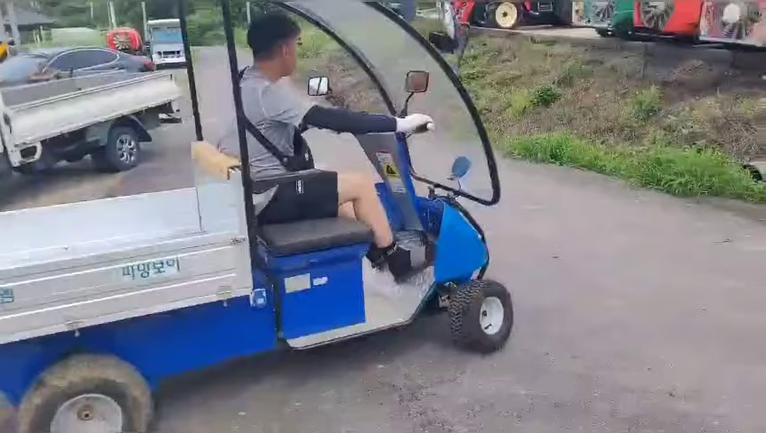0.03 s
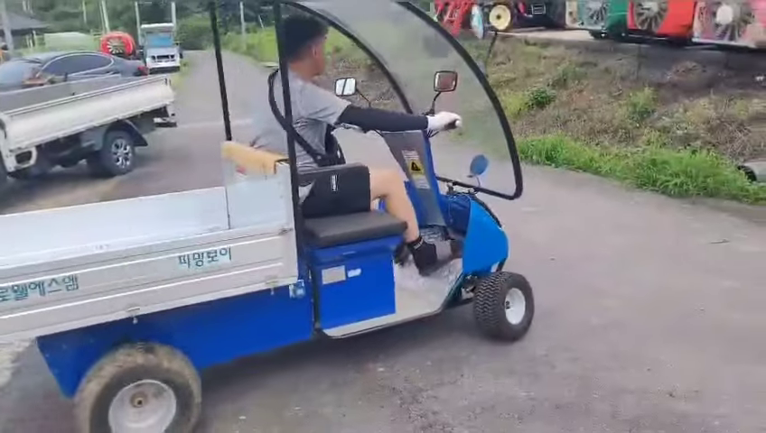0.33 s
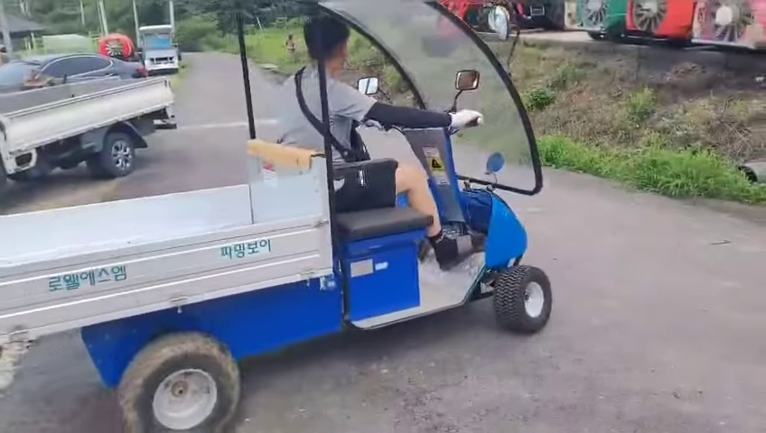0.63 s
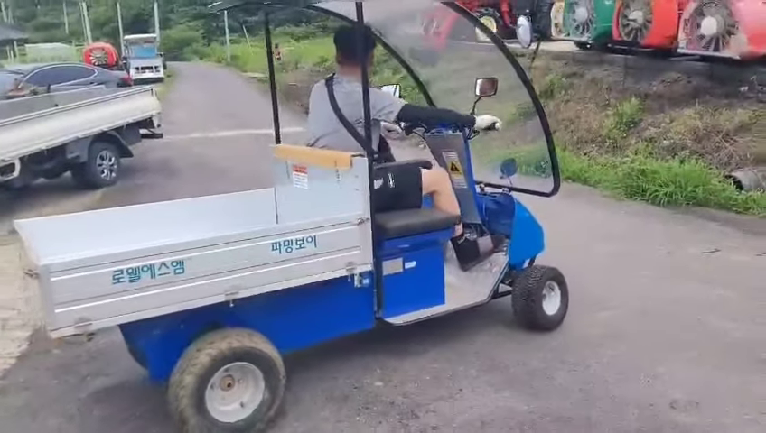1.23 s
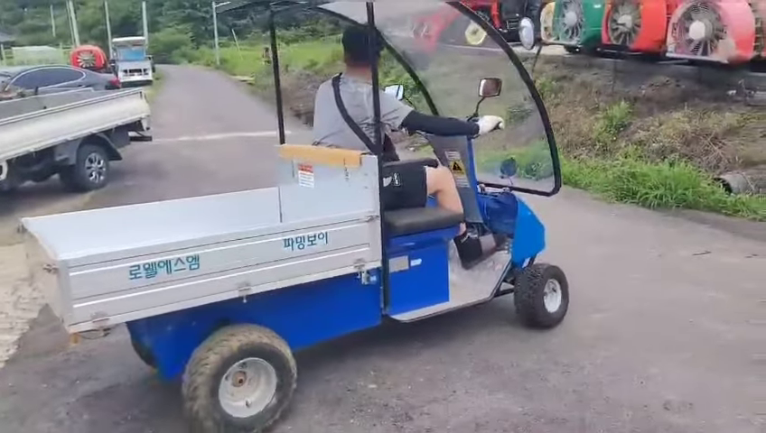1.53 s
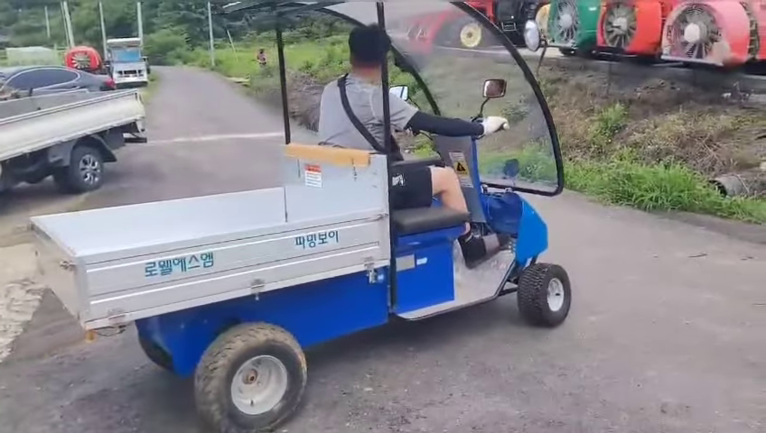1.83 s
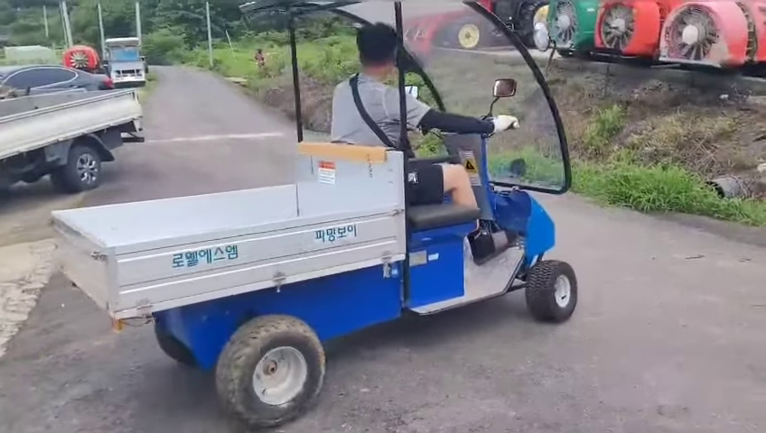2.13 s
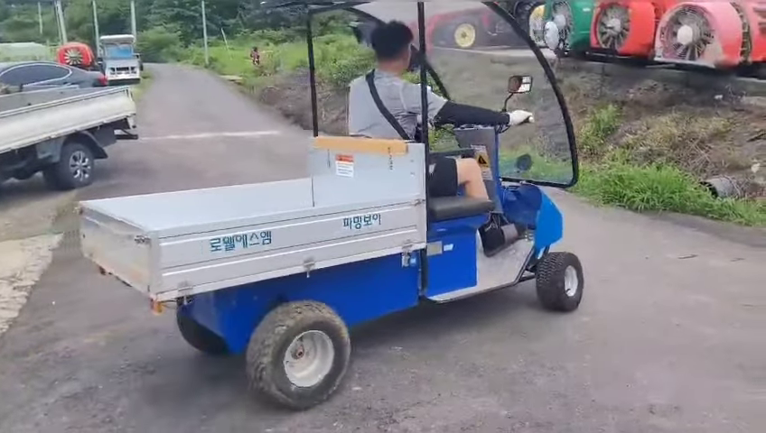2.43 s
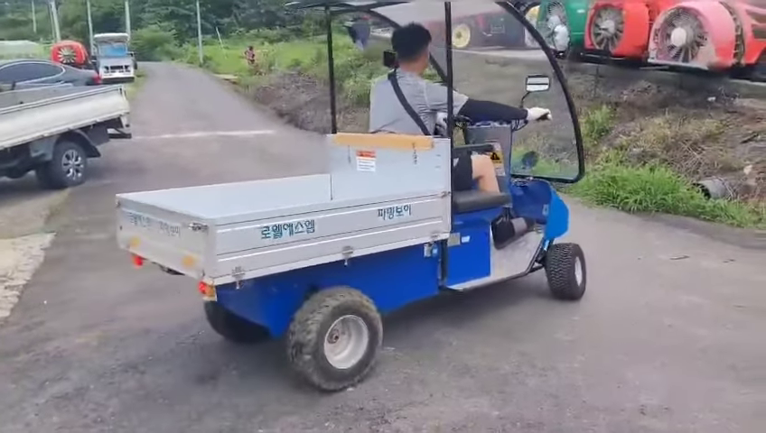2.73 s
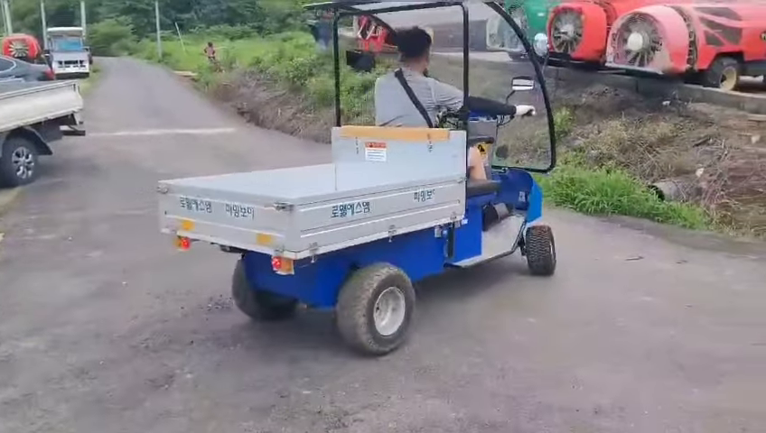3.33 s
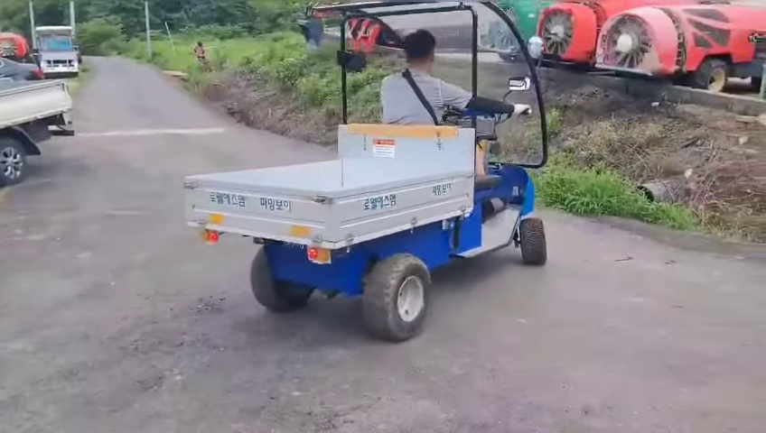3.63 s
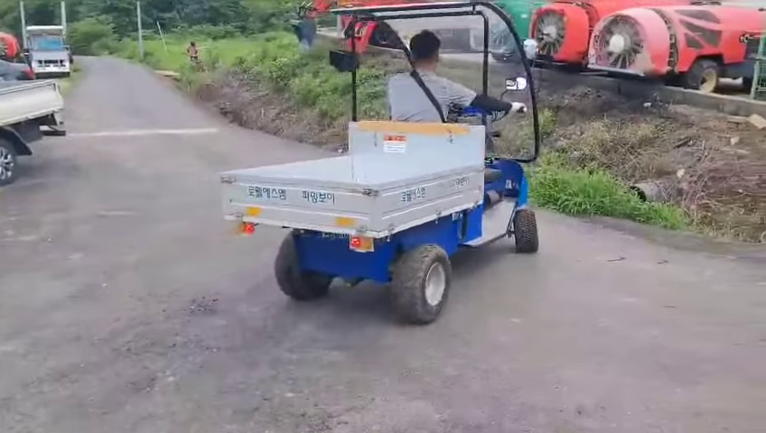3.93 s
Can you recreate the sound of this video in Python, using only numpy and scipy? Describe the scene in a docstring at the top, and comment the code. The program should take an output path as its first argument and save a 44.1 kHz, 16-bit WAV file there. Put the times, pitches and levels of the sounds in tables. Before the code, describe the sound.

An electric utility cart drives off over asphalt with a low hum, tyre thuds, crunching grit and light metal rattles, bumpiest late on. High cicada buzzing fills the open air around the microphone, closing with a few thin chirps.

```python
"""Electric cart and cicadas.

A small electric cart rolls away over a paved lot. Its motor whirrs low; the tyres rumble, thud over
bumps and crunch grit; the metal load bed knocks, rattles and squeaks. Two cicadas sing nearby, each
a train of tymbal clicks through a body resonance, over the hiss of a distant chorus.
Thin insect chirps close the scene."""
import sys
import numpy as np
from scipy.fft import rfft, irfft, next_fast_len
from scipy.io import wavfile
from scipy.ndimage import map_coordinates

SR = 44100
rng = np.random.default_rng(int(sys.argv[2]) if len(sys.argv) > 2 else 0)


def waveform_to_disk(signal):
    """Save audio, clipped to [-1, 1], as 16-bit WAV at the path in sys.argv[1]."""
    frames = np.transpose(np.atleast_2d(signal))
    scaled = np.clip(frames, -1, 1) * 32767
    samples = np.round(scaled).astype(np.int16)
    wavfile.write(sys.argv[1], SR, samples)


N = 176400
T = np.arange(N) / SR

# Left-right likeness of noise: freq_hz, correlation
EAR_CORRELATION = [(60, 0.9), (200, 1), (380, 0.94), (690, 0.2), (1280, 0.0056), (8000, 0)]

# Motor hum: time_s, pitch_hz
MOTOR_PITCH = [(0, 162.6), (2.9, 167), (3.1, 169), (3.5, 157), (4, 162.1)]
# Motor envelope: time_s, level_db
MOTOR_LEVEL = [(0, -42.5), (.3, -53.5), (.75, -58.5), (1.15, -66.5), (1.45, -49), (1.8, -59.5), (2.3, -59),
               (2.75, -51.5), (3.03, -42.5), (3.23, -46.5), (3.48, -44), (3.62, -54.5), (4, -53.5)]
# Motor whirr: freq_hz, gain_db
WHIRR_SPECTRUM = [(90, -38), (135, -10.5), (160, -6.5), (182, 3), (215, -11), (320, -15.5), (600, -58)]

# Tyre rumble envelope: time_s, level_db
RUMBLE_LEVEL = [(0, -41.5), (.3, -48), (.8, -54.5), (1.15, -54.5), (1.5, -46.5), (2.15, -53), (2.4, -42.5),
                (2.66, -42.5), (2.78, -47.5), (2.95, -42.5), (3.1, -46), (3.5, -46), (3.7, -41.5),
                (3.8, -46.5), (3.95, -41)]
# Road roar and tread hiss envelopes: time_s, road_db, tread_db
ROLLING_LEVELS = [(0.0, -46.5, -56.5), (0.18, -53, -54), (0.57, -52, -58), (1.28, -53, -59.5),
                  (1.66, -54, -56.5), (2.13, -53, -63), (2.49, -52, -57), (2.7, -51, -59),
                  (2.91, -48, -51.5), (3.43, -54, -55), (4.0, -52, -54.5)]
# Tyre rumble: freq_hz, gain_db
RUMBLE_SPECTRUM = [(20, -22), (35, -6), (52, -4.5), (72, 1), (92, -9), (125, -9), (220, -16.5),
                   (500, -45.5)]
# Road roar: freq_hz, gain_db
ROAD_SPECTRUM = [(100, 5.5), (240, 5.5), (340, 4), (490, -3.5), (790, 4), (1100, -2), (1900, -16),
                 (4300, -15.5), (15000, -32)]
# Tread hiss: freq_hz, gain_db
TREAD_SPECTRUM = [(600, -7.5), (1500, 2.5), (2800, 1), (4300, 3), (5000, 0.5), (7000, -12), (15000, -45)]

# First cicada's song: time_s, body_hz, clear_db, rasp_db
FIRST_SONG = [(0, 7050, -62, -41.5), (.58, 7140, -56, -42.5), (.68, 8310, -52, -45.5), (.8, 8980, -50, -55),
              (.95, 8825, -49, -54), (1.5, 9080, -47, -52), (1.8, 9050, -48, -50), (2.0, 8910, -46, -53),
              (2.25, 8670, -46, -48), (2.75, 8760, -48, -51), (3.05, 8860, -55.5, -57),
              (4, 8800, -49.5, -62)]
# Its tymbal clicks: time_s, rate_hz
FIRST_CLICKS = [(0, 501), (.58, 500), (.75, 486), (.92, 480.5), (1.5, 478.6), (1.7, 479.3), (1.9, 481.7),
                (2.3, 481.9), (4, 481.3)]
# Its flutter: time_s, rate_hz
FLUTTER_RATE = [(.55, 109), (.9, 85), (1.68, 78.5), (1.74, 114.5), (2.35, 109), (4, 106)]
# Its rasp about the body resonance: offset_hz, gain_db
RASP_SPECTRUM = [(-2400, -43), (-1200, -15.5), (-500, -1.5), (-84, -1), (214, 0), (480, -1.5), (680, -10.5),
                 (950, -5), (1498, -14), (3000, -67), (5000, -58)]
# Second cicada's song: time_s, body_hz, level_db
SECOND_SONG = [(0, 7350, -49.5), (.48, 7270, -49), (.58, 6600, -48.5), (.75, 6600, -56.5),
               (1.25, 6680, -55), (1.45, 6580, -47.5), (1.85, 6520, -50), (2.4, 6340, -49.5),
               (2.8, 6300, -48.5), (3.3, 6210, -47), (3.48, 6340, -47), (3.56, 6420, -48),
               (3.66, 6600, -61)]
# Its tymbal clicks: time_s, rate_hz, jitter_percent
SECOND_CLICKS = [(0, 539, .25), (.48, 540, .25), (.58, 548, .45), (.85, 544, .15), (1.55, 539.8, .07),
                 (2, 538.5, .15), (2.4, 538, .3), (2.7, 536, .95), (3.3, 530, .95), (3.42, 527, .5),
                 (3.49, 526, .3), (3.53, 541, 1.2), (3.63, 527, .9)]
# Distant chorus envelope: time_s, level_db
CHORUS_LEVEL = [(0, -50.5), (.58, -50), (.85, -43), (2, -42), (3.2, -44), (4, -43.5)]
# Distant chorus: freq_hz, gain_db
CHORUS_SPECTRUM = [(4900, -24), (5600, -9), (6500, -4), (7400, -6), (7800, -1), (8400, 1.5), (9200, -2.5),
                   (10300, -6), (11200, -13.5), (12000, -19), (15000, -27.5)]

# Load bed modes: freq_hz, gain_db
BED_MODES = [(600, -18), (786, -7.5), (1235, -3), (1426, -5.5), (1757, -8.5), (2146, -18), (2435, -20)]
# Load bed knocks: start_s, level_db, ring_hz
BED_KNOCKS = [(.003, -40, 890), (.198, -40, 706), (.278, -48, 1390), (0.376, -53, 1400), (.491, -43, 680),
              (.616, -48, 870), (0.832, -49, 1125), (1.185, -47.5, 680), (1.383, -45, 519),
              (1.398, -45, 870), (1.931, -35, 381), (1.945, -47, 620), (1.967, -47, 796), (2.335, -47, 790),
              (2.795, -37.5, 1520), (2.875, -31.5, 552), (2.882, -40, 1390), (2.899, -39.5, 780),
              (2.922, -37.5, 584), (2.956, -50, 1760), (3.005, -37, 450), (3.015, -43, 1000),
              (3.244, -45.5, 930), (3.304, -40.5, 1670), (3.334, -48, 1510)]
# Tyre thuds: start_s, level_db, pitch_hz
TYRE_THUDS = [(0.019, -46, 178), (0.178, -41, 62.4), (1.67, -34.5, 58.6), (2.014, -38, 71.4),
              (2.325, -33, 90.4), (2.63, -39, 62.8), (2.896, -31, 84), (2.951, -26.5, 65),
              (2.974, -33, 69.5), (3.456, -40, 75), (3.683, -33.5, 65.6), (3.88, -34.5, 47.3)]
# Grit crunches: start_s, length_s, level_db
GRIT_CRUNCHES = [(0.07, 0.028, -59), (0.961, 0.06, -54), (1.443, 0.095, -54), (1.696, 0.036, -54),
                 (1.968, 0.076, -48), (2.656, 0.049, -51), (2.773, 0.074, -45), (2.83, 0.083, -52),
                 (3.233, 0.15, -55), (3.55, 0.3, -54)]
# Stones snapping under the tread: start_s, level_db
STONE_SNAPS = [(0.075, -49), (.783, -47.5), (0.991, -50), (1.471, -43.5), (1.505, -46), (1.705, -49.5),
               (2.004, -52), (2.681, -44), (2.797, -41), (2.884, -48)]
# Grit clicks and knock ticks: freq_hz, gain_db
CLICK_SPECTRUM = [(500, -12), (1300, 4), (2800, 6.5), (4500, 4.5), (9000, -5), (15000, -29)]
# Cart squeaks: start_s, length_s, from_hz, to_hz, level_db
CART_SQUEAKS = [(1.332, .042, 10690, 10520, -47.5), (1.59, .06, 10550, 10490, -42.5)]
# Insect chirps: start_s, length_s, from_hz, to_hz, level_db
INSECT_CHIRPS = [(3.63, 0.18, 7900, 7610, -46), (3.66, .14, 6200, 6080, -53),
                 (3.78, 0.072, 7600, 7480, -45), (3.785, .22, 6500, 6330, -50),
                 (3.85, .17, 8000, 7770, -43)]


def amp(db):
    """Decibels to gain."""
    return 10 ** (np.asarray(db) / 20)


def unit(x):
    """Scale to rms 1."""
    return x / np.sqrt(np.mean(x ** 2) + 1e-20)


def along(points, hz):
    """Interpolate (freq_hz, value) points on a log axis."""
    freq_hz, values = np.transpose(points)
    return np.interp(np.log(hz + 1), np.log(freq_hz + 1), values)


def curves(rows):
    """One per-sample curve for each column after time_s."""
    time_s, *columns = np.transpose(rows)
    return [np.interp(T, time_s, column) for column in columns]


def wobble(rate_hz):
    """Smooth random curve, rms near 1, with knots at rate_hz."""
    return map_coordinates(rng.standard_normal(8192), [T * rate_hz], mode="wrap")


def filtered(x, response):
    """Apply a zero-phase gain, response(hz)."""
    size = next_fast_len(N + 8192)
    return irfft(rfft(x, size) * response(np.fft.rfftfreq(size, 1 / SR)), size)[..., :N]


def pan(left_db):
    """Stereo gains, left above right by left_db."""
    return amp(np.array([[.5], [-.5]]) * left_db)


def add(track, start_s, sound):
    """Mix a sound into a track."""
    part = track[..., max(round(start_s * SR), 0):][..., :sound.shape[-1]]
    part += sound[..., :part.shape[-1]]


def cycle(hz):
    """Running phase of a changing frequency."""
    return 2 * np.pi * np.cumsum(hz) / SR


def rush(spectrum):
    """Shaped stereo noise of rms 1, near mono in the bass."""
    def mid_side_gains(hz):
        width_rad = np.arccos(np.clip(along(EAR_CORRELATION, hz), -1, 1)) / 2
        return amp(along(spectrum, hz)) * [np.cos(width_rad), np.sin(width_rad)]
    mid, side = filtered(rng.standard_normal((2, N)), mid_side_gains)
    return unit(np.array([mid + side, mid - side]))


def motor(hum_db=-1, whirr_db=-6):
    """Electric motor: a wavering low hum inside a narrow band of noise."""
    pitch_hz = curves(MOTOR_PITCH)[0] * (1 + .022 * wobble(30))
    hum = np.sqrt(2) * np.sin(cycle(pitch_hz)) * amp(1.8 * wobble(18))
    whirr = rush(WHIRR_SPECTRUM)
    return amp(curves(MOTOR_LEVEL)[0]) * (amp(hum_db) * hum + amp(whirr_db) * whirr)


def rolling(road_boost_db=3, tread_boost_db=1, grain_db=1):
    """Tyres on asphalt: rumble, road roar and grainy tread hiss, each uneven in level."""
    road_db, tread_db = curves(ROLLING_LEVELS)
    hiss = unit(amp(grain_db * wobble(500)) * rush(TREAD_SPECTRUM))
    rumble = amp(curves(RUMBLE_LEVEL)[0] + 1.2 * wobble(12)) * rush(RUMBLE_SPECTRUM)
    roar = amp(road_db + road_boost_db + 1.5 * wobble(29.76)) * rush(ROAD_SPECTRUM)
    tread = amp(tread_db + tread_boost_db + 2.5 * wobble(26)) * hiss
    return pan(2) * rumble + roar + tread


def tymbal_buzz(click_hz, body_hz, half_width_hz, scatter, rough, ear_rad, harmonics,
                sway_rad=0, smear_rad=0):
    """Harmonics of uneven clicks through a body resonance; scattered paths make each one fade."""
    click_phase, out = cycle(click_hz), np.zeros((2, N))
    for k in harmonics:
        phase = k * click_phase + sway_rad + smear_rad * wobble(110) + 2 * np.pi * rng.random()
        resonance = 1 / (1 + 1j * (k * click_hz - body_hz) / half_width_hz)
        roughness = 1 + rough * (wobble(170) + 1j * wobble(170))
        partial = np.exp(1j * phase) * resonance * roughness
        for ear, side in zip(out, (.5, -.5)):
            direct = np.exp(1j * side * ear_rad)
            scattered = scatter * (wobble(23) + 1j * wobble(18))
            ear += (partial * (direct + scattered)).real
    return out * np.sqrt(2 / (1 + 2 * scatter ** 2) / (1 + 2 * rough ** 2))


def first_cicada(clear_depth=.65, rasp_depth=.028, jitter=.00043, waver=.000492):
    """A hoarse rasp slides up with the body resonance and clears into a fluttering buzz."""
    body_hz, clear_db, rasp_db = curves(FIRST_SONG)
    click_hz = curves(FIRST_CLICKS)[0] * (1 + jitter * wobble(120) + waver * wobble(14))
    flutter_hz = curves(FLUTTER_RATE)[0] * (1 + .012 * wobble(24.62))
    flutter = np.cos(cycle(flutter_hz))
    clear = tymbal_buzz(click_hz, body_hz, half_width_hz=250, scatter=.27, rough=.08, ear_rad=1.6,
                        harmonics=range(13, 24), sway_rad=.3 * flutter)
    clear *= 1 + clear_depth * flutter
    # Rasp: a noise band built around 0 Hz, then shifted up to the resonance.
    offset_hz = np.fft.fftfreq(N, 1 / SR)
    band_db = np.interp(offset_hz, *np.transpose(RASP_SPECTRUM), left=-np.inf, right=-np.inf)
    white = rng.standard_normal((2, N)) + 1j * rng.standard_normal((2, N))
    band = (np.fft.ifft(amp(band_db) * white) * np.exp(1j * cycle(body_hz))).real
    pulsing = 1 + .15 * np.cos(cycle(click_hz))
    rasp = unit(band * pulsing * (1 + rasp_depth * flutter))
    return pan(3.7) * amp(clear_db) * clear + pan(5.1) * amp(rasp_db) * rasp


def second_cicada():
    """A lower tymbal buzz sags slowly, turns ragged and dies away."""
    click_hz, jitter_percent = curves(SECOND_CLICKS)
    body_hz, level_db = curves(SECOND_SONG)
    click_hz *= 1 + jitter_percent / 100 * wobble(150)
    song = tymbal_buzz(click_hz, body_hz, half_width_hz=230, scatter=.36, rough=.28, ear_rad=1.1,
                       harmonics=range(10, 15), smear_rad=.4 * jitter_percent)
    return pan(1) * amp(level_db + wobble(30.02)) * song


def chorus(flicker_db=.6):
    """Distant cicadas merge into a hiss."""
    level_db = curves(CHORUS_LEVEL)[0] + flicker_db * wobble(16)
    return pan(1.4) * amp(level_db) * rush(CHORUS_SPECTRUM)


def knock(ring_hz, half_width_oct=.69):
    """One blow on the bed: a short ring, the modes near it, clatter of loose parts, a bright tick."""
    t = np.arange(SR // 4) / SR

    def decay(level_db, t60_s):
        return amp(level_db - 60 * t / t60_s)

    def near_ring(hz):
        return 1 / (1 + (np.log2((hz + 1) / ring_hz) / half_width_oct) ** 2)

    def noise(response):
        white = rng.standard_normal((2, len(t))) + rng.standard_normal(len(t))  # per ear + shared
        return unit(irfft(rfft(white) * response(np.fft.rfftfreq(len(t), 1 / SR)), len(t)))

    ring = np.sin(2 * np.pi * ring_hz * t) * decay(5, t60_s=.03)
    modes = np.zeros((2, len(t)))
    for hz, gain_db in BED_MODES:
        ear_rad = rng.normal(0, .27, (2, 1))
        modes += near_ring(hz) * amp(gain_db) * np.sin(2 * np.pi * hz * t + ear_rad)
    modes *= decay(-4, t60_s=.13)
    clatter = noise(near_ring) * decay(-2, t60_s=.093)
    tick = noise(lambda hz: amp(along(CLICK_SPECTRUM, hz)) * (hz > 400)) * decay(-12, t60_s=.04)
    tick *= min(ring_hz / 600, 1) ** 2  # low knocks are duller
    attack = 1 - np.exp(-t / .0012)
    return (ring + modes + clatter + tick) * attack


def load_bed(rattle_db=-57, spread_db=6.5, centre_hz=900, rattles=45):
    """The metal bed knocks over bumps and rattles faintly at random times."""
    out = np.zeros((2, N))
    for start_s, level_db, ring_hz in BED_KNOCKS:
        add(out, start_s, amp(level_db) * knock(ring_hz))
    for when, size, pitch in rng.random((rattles, 3)):
        level_db = rattle_db + spread_db * (size - .5)
        ring_hz = centre_hz * 2 ** (2 * pitch - 1)
        add(out, when * N / SR, amp(level_db) * knock(ring_hz))
    return out


def thuds(rise_s=.0076):
    """The tyres bounce for a few cycles at each bump."""
    out, t = np.zeros(N), np.arange(SR // 5) / SR
    envelope = t / rise_s * np.exp(1 - t / rise_s)
    for start_s, level_db, pitch_hz in TYRE_THUDS:
        add(out, start_s, amp(level_db) * envelope * np.sin(2 * np.pi * pitch_hz * t))
    return pan(7.5) * out


def grit(clicks_per_s=1500, spread_db=1, dust_gain=.14, snap_t60_s=.06):
    """Grit crunches and stones snap under the tread: showers of tiny clicks over dusty noise."""
    crunches = sum(amp(level_db) * np.sin(np.pi * np.clip((T - start_s) / length_s, 0, 1))
                   for start_s, length_s, level_db in GRIT_CRUNCHES)
    snaps = sum(amp(level_db - 60 * np.abs(T - start_s) / snap_t60_s) * (T >= start_s)
                for start_s, level_db in STONE_SNAPS)
    hits = rng.random(N) < clicks_per_s / SR
    clicks = hits * amp(spread_db * rng.standard_normal(N)) * rng.choice([-1, 1], (2, N))
    dust = dust_gain * rng.standard_normal((2, N))
    shower = unit(filtered(clicks + dust, lambda hz: amp(along(CLICK_SPECTRUM, hz))))
    return (crunches + snaps) * shower


def glides(rows, peak_share):
    """Sliding sine tones, each loudest at peak_share of its length."""
    out = np.zeros(N)
    for start_s, length_s, from_hz, to_hz, level_db in rows:
        progress = (T - start_s) / length_s
        envelope = np.interp(progress, [0, peak_share, 1], [0, 1, 0])
        pitch_hz = np.interp(progress, [0, 1], [from_hz, to_hz])
        out += amp(level_db) * envelope * np.sin(cycle(pitch_hz))
    return out


def squeaks(rough=.22):
    """Two thin, scratchy falling squeaks from the running gear, on the left."""
    return pan(15) * glides(CART_SQUEAKS, peak_share=.18) * (1 + rough * wobble(300))


def chirps(rough=.35):
    """Rough falling insect chirps follow the second cicada's buzz."""
    roughness = 1 + rough * np.array([wobble(180), wobble(130)])
    return glides(INSECT_CHIRPS, peak_share=.34) * roughness


def scene():
    """The cart among the cicadas."""
    sustained = motor() + rolling() + first_cicada() + second_cicada() + chorus()
    return sustained + load_bed() + thuds() + grit() + squeaks() + chirps()


def record(dry, cutoff_hz=15350):
    """Brick-wall low-pass."""
    return filtered(dry, lambda hz: hz < cutoff_hz)


dry = scene()
out = record(dry)
waveform_to_disk(out)
```